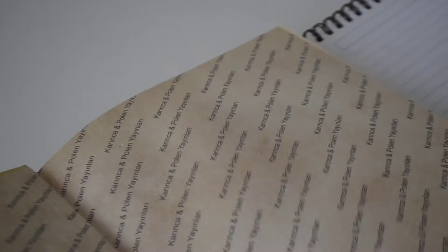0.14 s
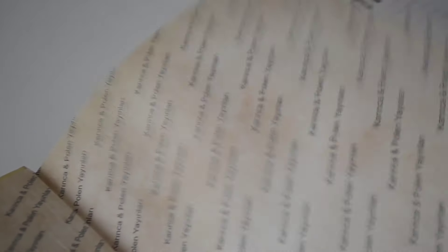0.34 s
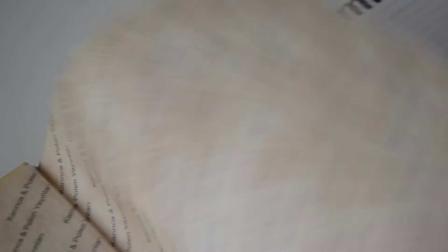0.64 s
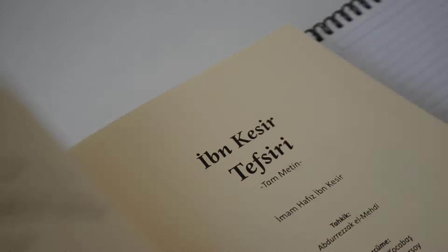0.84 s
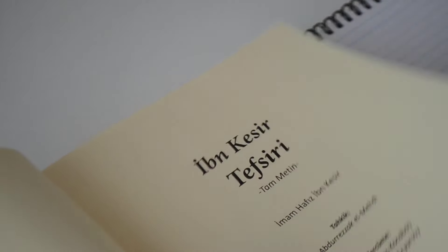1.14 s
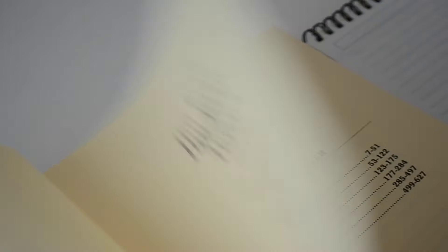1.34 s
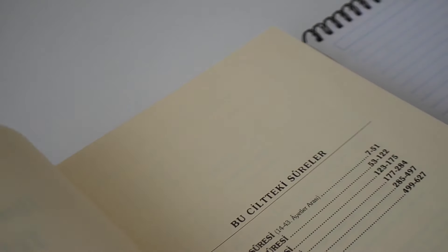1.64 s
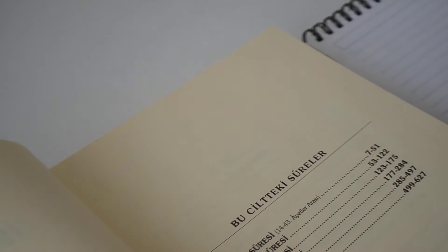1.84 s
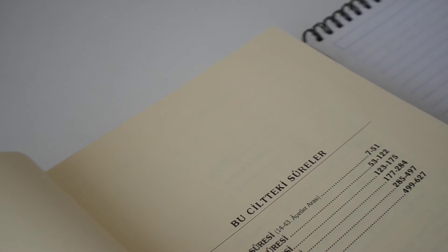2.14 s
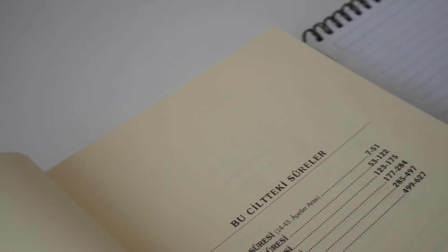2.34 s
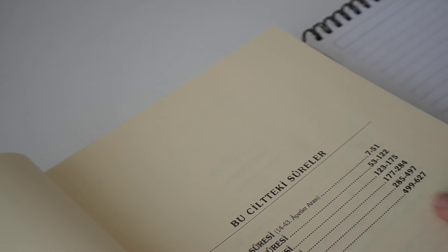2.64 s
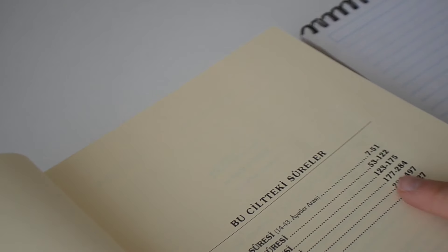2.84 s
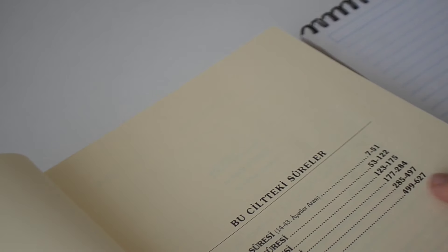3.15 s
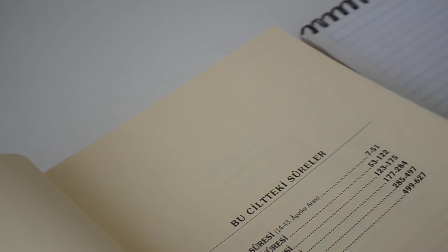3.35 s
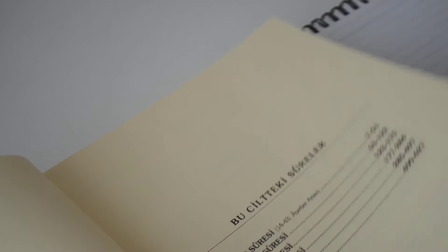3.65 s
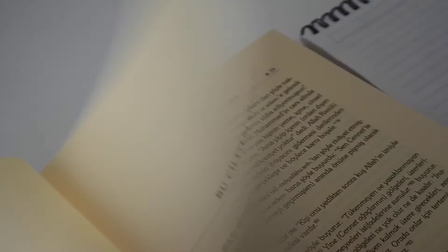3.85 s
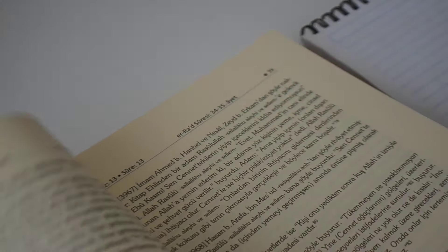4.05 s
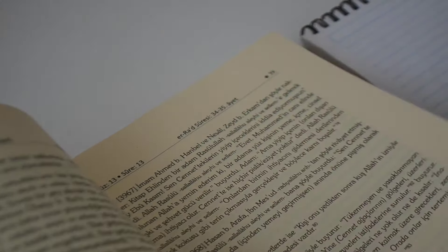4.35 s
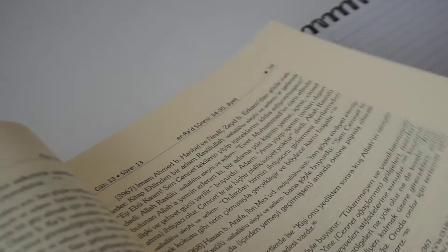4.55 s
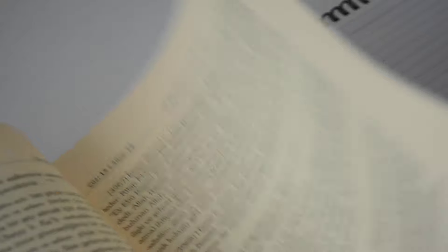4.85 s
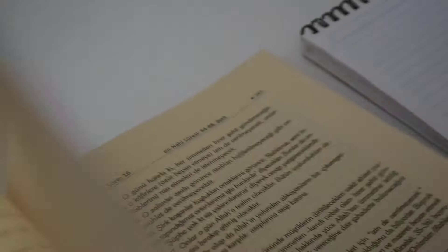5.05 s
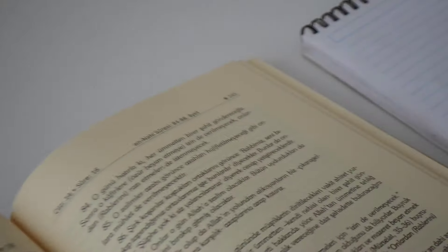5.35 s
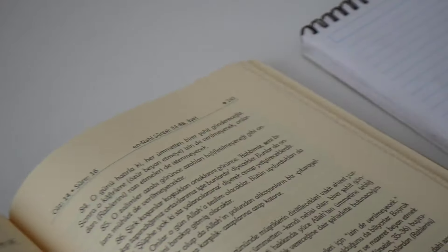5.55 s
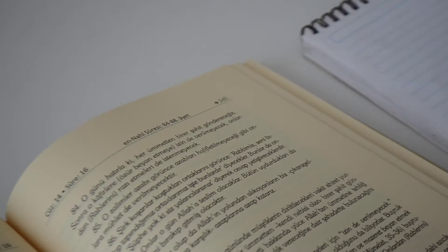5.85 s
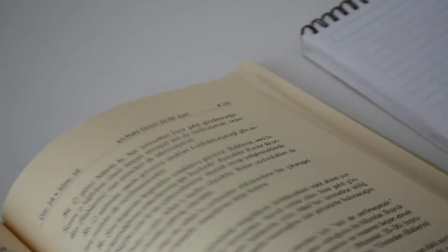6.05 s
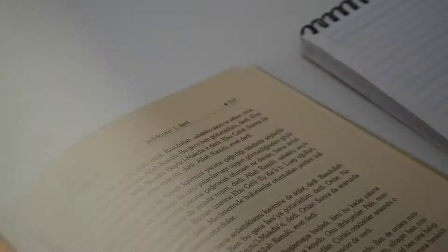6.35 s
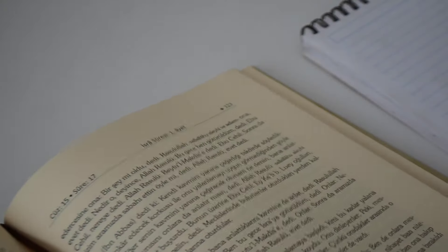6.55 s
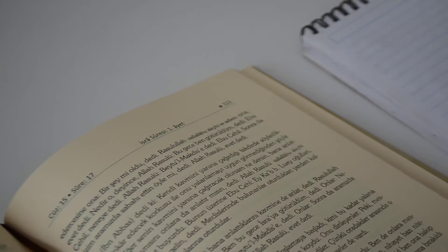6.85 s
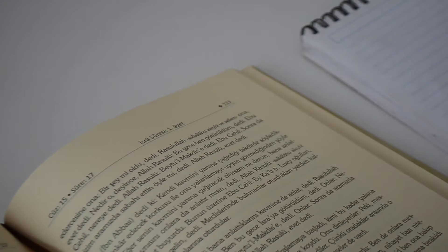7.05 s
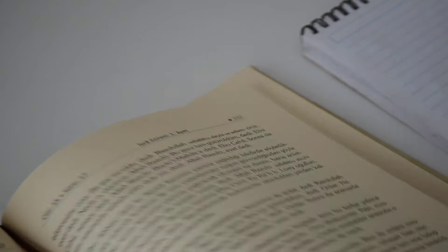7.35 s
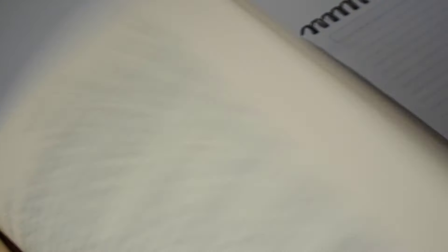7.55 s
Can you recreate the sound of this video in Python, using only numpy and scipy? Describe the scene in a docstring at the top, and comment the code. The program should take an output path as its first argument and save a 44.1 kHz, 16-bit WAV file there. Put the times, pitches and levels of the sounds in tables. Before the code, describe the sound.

Close, dry page turning from a thick book on a desk in a quiet room, over faint low-weighted hiss and a very thin, steady high whine. From 0 to 0.9 seconds, light sliding, a small juddering rasp and soft flicks. At 1.1 a loud crisp snap starts a burst of pops, crackles and bright edge clicks until about 1.65. Another hard snap at 1.84 leads to more snaps and swishes through 2.1. Then near stillness, with one tiny pop around 2.65. Rustling returns at 3.5; a muffled snap at 3.7 and a firmer landing at 4.05 with a soft puff. Rubbing follows, a hollow papery pop at 4.83, then a cluster of dull snaps at 5.3-5.5. Light brushing near 5.9, then a juddering slide into a snap with a deep soft thump at 6.5. Quiet rustles around 7.1, and a final sharp snap at 7.68.

```python
"""Pages of a thick book rustle, crackle and snap, close by on a desk in a quiet room, under a thin high whine.
Sheets slide with a low flutter and a fibrous hiss (shaped noise clicks) and judder in trains of slips.
They snap as they buckle (short resonant pulses), flick at the edges and land with a soft puff of air.
A few low or papery tones ring on. Echoes and a short tail from nearby surfaces colour most of the paper."""
import sys
import numpy as np
from scipy import signal
from scipy.fft import rfft, irfft
from scipy.io import wavfile

SR = 44100
rng = np.random.default_rng(int(sys.argv[2]) if len(sys.argv) > 2 else 0)


def materialize(psi):
    """Save the field psi as 16-bit PCM at rate SR to the path in sys.argv[1].

    A 1-D psi becomes a single channel; in a 2-D psi each row is a channel.
    """
    bounded = np.clip(np.atleast_2d(psi).T, -1, 1)
    quanta = np.round(bounded * 32767).astype(np.int16)
    wavfile.write(sys.argv[1], SR, quanta)


N = 340011  # length in samples

# Event levels below come before each layer's trim and the room.
# Spectrum of the background hiss. Each row: frequency in Hz, relative level in dB.
HISS_FLOOR_COLOUR = [(12, -60), (20, -5.5), (76, -2.5), (259, -11), (289, -8), (401, -14.5), (499, -9.5),
                     (556, -13), (731, -14), (1130, -15.5), (2630, -21.5), (3650, -25), (4540, -30),
                     (13500, -38.5)]
HISS_FLOOR_DB = -54.5
# Stereo width of the background hiss. Each row: frequency in Hz, side against middle in dB.
HISS_FLOOR_WIDTH = [(30, -26), (130, -11.5), (300, -8), (1000, -6), (4000, -9), (7000, -10.5), (10000, -5),
                    (14000, -7)]
WHINE_HZ, WHISTLE_HZ, FLIP_CYCLE_HZ = 15000, 15677, 29.97
TOP_EDGE_HZ = 15900
# Nearby surfaces; the back of a sheet radiates with opposite sign. Each row: delay in ms, gain.
ECHOES = [(1.15, 0.046), (2.0, 0.0068), (3.3, 0.11), (5.05, -0.17), (7.9, 0.0035), (16.2, -0.13)]
# Decay of the diffuse tail. Each row: frequency in Hz, time to fall 60 dB in seconds.
ROOM_DECAY = [(150, 0.82), (400, 0.35), (1040, 0.091), (2760, 0.03), (7280, 0.45)]
# A hanging sheet or the desk rings on.
# Each row: start in seconds, pitch in Hz, peak level in dB, time to fall 60 dB in seconds.
RINGS = [(1.1, 64, -42.5, 2.4), (1.85, 65, -42.5, 1.8), (3.72, 61.4, -45, 1.9), (4.01, 62.4, -49, 0.92),
         (4.067, 639, -37, 0.4), (4.83, 700, -31, 0.2), (5.296, 703, -35.5, 0.41), (6.51, 66.7, -49, 0.81)]
# A sheet lands and pushes air out. Each row: start in seconds, peak level in dB.
PUFFS = [(0.79, -36), (1.095, -29), (1.197, -36), (4.009, -25.5), (4.067, -31.5), (4.446, -32),
         (4.577, -38.5), (5.063, -35.5), (5.322, -28.5), (5.359, -44), (6.508, -18)]
# Spectrum of a puff. Each row: frequency in Hz, relative level in dB.
PUFF_COLOUR = [(20, -9), (60, 4), (125, 2), (190, -3.5), (300, -3), (600, -29), (2000, -62), (8000, -78)]
# One sheet slides over another. Each row: start, fastest moment and end in seconds (sorted on use),
# flutter of the sheet in dB, hiss of its fibres in dB.
SLIDES = [(0.0, 0.006, 0.044, -41.5, -74), (0.097, 0.123, 0.91, -54.5, -55), (0.32, 0.39, 0.55, -41, -57.5),
          (0.51, 0.598, 0.74, -47, -54), (0.663, 0.72, 0.8, -43.5, -47), (0.788, 0.846, 0.944, -40, -50),
          (0.918, 0.97, 1.14, -50.5, -58), (1.108, 1.13, 1.58, -40, -50), (1.26, 1.384, 1.54, -49, -46.5),
          (1.448, 1.512, 1.705, -37.5, -49), (1.654, 1.75, 1.89, -51.5, -47.5),
          (1.833, 1.993, 2.09, -46.5, -42), (2.071, 2.162, 2.225, -49, -46), (2.35, 2.6, 3.6, -61.5, -64.5),
          (3.148, 3.423, 3.5, -63, -59.5), (3.493, 3.562, 3.66, -44.5, -43),
          (3.66, 3.722, 4.04, -47.5, -52), (3.997, 4.05, 4.17, -51, -48), (4.296, 4.318, 4.34, -47, -58.5),
          (4.36, 4.483, 4.64, -44.5, -49), (4.6, 4.621, 4.65, -77, -50), (4.725, 4.763, 4.73, -48, -62),
          (4.85, 4.938, 5.16, -48, -61), (5.04, 5.095, 5.3, -46.5, -55.5), (5.219, 5.357, 5.5, -39, -45.5),
          (5.474, 5.513, 5.69, -48, -53), (5.724, 5.746, 6.06, -51, -57), (5.845, 5.924, 6.12, -43, -49),
          (6.025, 6.075, 6.46, -51.5, -59), (6.203, 6.29, 6.41, -54, -53),
          (6.365, 6.51, 6.52, -35.5, -58.5), (6.5, 6.56, 6.7, -43.5, -48), (6.649, 6.684, 6.84, -51, -50),
          (6.783, 6.864, 7.2, -61, -63), (7.08, 7.133, 7.27, -47, -51), (7.186, 7.35, 7.56, -53, -54.5),
          (7.671, 7.682, 7.63, -34.5, -56)]
# An edge slides off its neighbour.
# Each row: start, loudest moment and end in seconds (sorted on use), level in dB.
EDGE_SWISHES = [(0.625, 0.77, 0.76, -49), (0.79, 0.843, 0.85, -43.5), (1.368, 1.37, 1.41, -35.5),
                (2.021, 2.07, 2.04, -36), (3.584, 3.627, 3.665, -41), (4.002, 4.02, 4.05, -38.5),
                (4.02, 4.06, 4.12, -41), (6.011, 6.297, 6.26, -56.5)]
# Spectra of flutter, fibre hiss and edge swish. Each row: frequency in Hz, relative level in dB.
FLUTTER_COLOUR = [(25, -3.5), (70, -6.5), (170, -4), (350, 3.5), (650, 2.5), (1100, 3), (1700, -1.5),
                  (2400, -6), (5000, -34), (12000, -74)]
HISS_COLOUR = [(200, -46), (1200, 8.5), (2400, 3), (3600, 3.5), (4900, 0.5), (6000, -7.5), (7200, -16.5),
               (10000, -22.5), (16000, -19)]
SWISH_COLOUR = [(300, 7), (1500, 3), (3000, 2), (5200, 0.5), (7000, -8), (9000, -12), (12000, -22),
                (16000, -27)]
SWELL_POWER = 0.83  # loudness follows the sliding speed to this power
SHAKE_DB, SHAKE_S = -27.5, 0.041  # flutter after a snap: level against the snap's, decay time constant
# A lifted sheet brushes along its neighbour.
# Each row: start, loudest moment and end in seconds (sorted on use), level in dB.
BRUSHES = [(0.317, 0.34, 0.359, -39), (0.535, 0.596, 0.65, -44), (3.386, 3.396, 3.49, -55),
           (4.39, 4.53, 4.52, -48.5), (4.89, 4.986, 5.06, -46.5), (5.255, 5.28, 5.44, -49),
           (5.42, 5.465, 5.47, -39), (5.86, 5.9, 6.01, -45), (6.424, 6.444, 6.48, -46),
           (7.069, 7.106, 7.32, -50)]
# Spectrum of a brush. Each row: frequency in Hz, relative level in dB.
BRUSH_COLOUR = [(300, -37), (900, -30), (1500, 8.5), (2300, 3.5), (3400, 1), (5000, -8.5), (7000, -26),
                (16000, -37)]
# A sheet sticks and slips. Each row: start, loudest moment and end in seconds (sorted on use), level in dB,
# typical slips per second, bass tilt in dB, treble tilt in dB, resonance in Hz.
JUDDERS = [(0.355, 0.4, 0.47, -30.5, 440, -2, -18.5, 1340), (0.705, 0.759, 0.84, -31, 345, -1, -22.5, 615),
           (1.181, 1.2, 1.205, -33, 490, -9, -27, 1450), (1.33, 1.338, 1.46, -29, 436, 4, -14, 1510),
           (3.716, 3.733, 3.745, -28.5, 450, -7, -33, 1220), (5.854, 5.947, 5.9, -39, 395, -3, -17, 1230),
           (6.349, 6.371, 6.42, -35, 380, -2, -35, 1050), (6.427, 6.455, 6.48, -23.5, 460, -16, -26, 760),
           (7.07, 7.113, 7.15, -32.5, 305, -25, -30, 1090)]
# A paper edge flicks free. Each row: start in seconds, level in dB.
TICKS = [(0.367, -30.5), (0.3945, -35), (0.5173, -31), (0.7702, -21), (0.943, -41), (1.265, -26),
         (1.335, -15.5), (1.3775, -13.5), (1.5609, -22), (2.0562, -22), (2.707, -41.5), (4.591, -34),
         (5.0355, -40), (5.2462, -32), (5.953, -26.5), (6.5196, -24), (6.6228, -29)]
# Spectrum of a flick. Each row: frequency in Hz, relative level in dB.
TICK_COLOUR = [(100, -83), (700, 7), (1800, 4.5), (3400, 3.5), (5000, -0.5), (7000, -25), (11000, -32),
               (16000, -29)]
# A sheet buckles. Each row: start in seconds, level in dB, bass tilt in dB, treble tilt in dB,
# main resonance of the bent sheet in Hz.
SNAPS = [(0.3663, -25, 4.5, -18, 1290), (0.673, -34, -8, -18, 1000), (0.77, -28, 4, -16, 890),
         (1.0954, -3, -7, -9.5, 897), (1.195, -9.5, -7, -11, 890), (1.2544, -15.5, -58, -9, 910),
         (1.3073, -18, -12, -6, 1510), (1.336, -12, -19, -6, 1640), (1.3787, -15.5, -19, -38, 1490),
         (1.5096, -21.5, -25.5, -1, 1490), (1.5605, -24, -14, -20, 1113), (1.64, -30.5, -32, -38, 1300),
         (1.8419, -4, -14, -13.5, 890), (1.892, -21.5, -1, -22, 1194), (1.924, -26, -16, -13, 1380),
         (1.9554, -8.5, -36, -14, 950), (2.0369, -13, -27, -17, 890), (2.0877, -20, -35, -12, 913),
         (2.647, -33.5, 1, -25, 606), (3.7256, -22.5, -12, -45, 1120), (3.803, -32, -20, -38, 1490),
         (3.956, -34.5, 11, -8.5, 850), (4.0072, -21, -21, -17, 684), (4.0661, -25, 1, -8, 686),
         (4.068, -12.5, -23.5, -20, 665), (4.829, -18.5, -2.5, -44, 702), (4.866, -32, -19, -44, 706),
         (4.938, -29.5, -12, -25, 710), (5.295, -13, -6, -47, 620), (5.3229, -12.5, -3, -15.5, 720),
         (5.4112, -18.5, -10, -15.5, 623), (5.521, -29.5, -1, -13, 690), (5.953, -31, -4, -16, 1013),
         (6.354, -23, -26, -18, 1130), (6.3712, -26, -25, -22, 1105), (6.5098, -15, -2.5, -19, 657),
         (6.517, -12.5, -17, -12, 1250), (7.084, -26, -43, -30, 980), (7.1807, -25.5, -21, -9.5, 1093),
         (7.645, -27, 2, -22, 680), (7.6806, -10.5, -23, -10.5, 1210), (7.6835, -13.5, -3, -27, 524)]
# Spectrum of a flexing sheet before tilt and resonance. Each row: frequency in Hz, relative level in dB.
SHEET_COLOUR = [(40, -2), (120, -3), (280, 3), (500, 0), (850, 1.5), (1200, -4.5), (1600, 2), (2200, -3.5),
                (3100, 0.5), (4500, -9), (6500, -28), (10000, -40), (16000, -39)]


def amp(db):
    """Decibels to gain."""
    return 10 ** (np.asarray(db) / 20)


def unit(x):
    """Scales to rms 1."""
    return x / np.sqrt(np.mean(x ** 2) + 1e-20)


def read(points, hz):
    """Reads (Hz, value) points on a log-frequency axis."""
    f, value = np.transpose(points)
    return np.interp(np.log(hz + 1), np.log(f + 1), value)


def add(mix, s, sound):
    """Mixes a sound in at s seconds, cutting what runs past the end."""
    part = mix[max(round(s * SR), 0):][:len(sound)]
    part += sound[:len(part)]


def pulse(*colours, spread_ms=0, size=4096):
    """A causal pulse with the product of the given spectra; bending waves bring its treble first."""
    hz = np.fft.fftfreq(size, 1 / SR)
    log_gain = np.log(amp(sum(read(c, abs(hz)) for c in colours)))
    minimum_phase = np.conj(signal.hilbert(log_gain))
    # spread_ms is the added delay at 1 kHz; it shrinks as frequency rises
    lag = 4 * np.pi * spread_ms * np.sign(hz) * np.sqrt(abs(hz) / 1000)
    wave = np.fft.ifft(np.exp(minimum_phase - 1j * lag)).real[:size // 2]
    return wave / np.linalg.norm(wave)


def tint(x, colour):
    """Gives a long noise a spectrum, at rms 1."""
    gain = amp(read(colour, np.fft.rfftfreq(N, 1 / SR)))
    return unit(irfft(rfft(x) * gain, N))


def drift(per_s):
    """A random curve: per_s normal values a second, joined by straight lines."""
    knots = rng.standard_normal(N)
    return np.interp(np.arange(N) * per_s / SR, np.arange(N), knots)


def stroke(start, top, end):
    """A swell from nothing to 1 and back, with its three times put in order."""
    return np.interp(np.arange(N) / SR, np.sort([start, top, end]), [0, 1, 0])


def friction(colour, per_s, spread_db, clump_db):
    """Countless fibres catch and let go: clicks of uneven size whose strength swells in clumps."""
    size = amp(spread_db * np.minimum(rng.exponential(1, N), 4))
    hits = rng.random(N) < per_s / SR
    clicks = rng.standard_normal(N) * size * hits
    return tint(clicks * amp(clump_db * drift(140)), colour)


def struck(wave, noise_gain, decay_s, length):
    """Drives a pulse with one click and a dying noise, both at the same spot."""
    t = np.arange(length) / SR
    force = (t == 0) + noise_gain * rng.standard_normal(length) * np.exp(-t / decay_s)
    return signal.fftconvolve(force, wave)


def sheet(bass_db, treble_db, hz, ring_db=6, width=1.23, bend_ms=0.836):
    """One flexing of a sheet: a wide bend is dull and low, a tight one is bright."""
    knee = np.clip(1.74 * hz, 600, 1800)  # the treble tilt starts here
    tilt = [(250, bass_db), (500, 0), (knee, 0), (2 * knee, treble_db)]
    resonance = [(hz / width, 0), (hz, ring_db), (hz * width, 0)]
    return pulse(SHEET_COLOUR, tilt, resonance, spread_ms=bend_ms)


def background(whine_db=-60.0, whistle_db=-75):
    """Background hiss is shaped noise, partly independent left and right; a whistle and a sign-flipping whine join."""
    t, hz = np.arange(N) / SR, np.fft.rfftfreq(N, 1 / SR)
    mid, side = (tint(rng.standard_normal(N), HISS_FLOOR_COLOUR) for _ in range(2))
    side = irfft(rfft(side) * amp(read(HISS_FLOOR_WIDTH, hz)), N)
    hiss_floor = mid + np.array([side, -side])
    flips = np.tanh(30 * np.sin(2 * np.pi * FLIP_CYCLE_HZ * t))  # two flips a cycle
    whine = unit(flips * np.sin(2 * np.pi * WHINE_HZ * t))
    whistle = unit(np.sin(2 * np.pi * WHISTLE_HZ * t))
    return amp(HISS_FLOOR_DB) * hiss_floor + amp(whine_db) * whine + amp(whistle_db) * whistle


def room(x, wet_db=-8, build_s=0.0039, side_db=-19):
    """Surfaces return distinct echoes, and a short diffuse tail differs slightly between the ears."""
    hz = np.fft.rfftfreq(N + SR, 1 / SR)
    paths = 1 + sum(gain * np.exp(-2j * np.pi * hz * ms / 1000) for ms, gain in ECHOES)
    near = irfft(rfft(x, N + SR) * paths, N + SR)[:N]
    # half a second of noise, building up quickly and dying at its own rate in each band
    hz, t, z = signal.stft(rng.standard_normal((2, SR // 2)), SR, nperseg=256)
    z = z * 1000 ** (-t / read(ROOM_DECAY, hz)[:, None])
    build = 1 - np.exp(-(t / build_s) ** 2)
    tails = signal.istft(z * build, SR, nperseg=256)[1]
    tails = tails / np.linalg.norm(tails[0])
    mid, side = signal.oaconvolve(x[None], tails, axes=1)[:, :N]
    return near + amp(wet_db) * (mid + amp(side_db) * np.array([side, -side]))


def rings(wander=0.021):
    """Single modes die away, cut after a second; their pitch wanders as the sheet keeps bending."""
    out, t = np.zeros(N), np.arange(SR) / SR
    for s, hz, db, t60 in RINGS:
        turns = np.cumsum(hz * (1 + wander * drift(134)[:SR])) / SR
        fade = np.exp(-np.log(1000) * t / t60)
        add(out, s, amp(db) * np.sin(2 * np.pi * turns) * fade)
    return out


def puffs(trim_db=-1, eddy=0.072, settle_s=0.019):
    """The air cushion under a falling sheet gives a soft low push, then eddies as the sheet settles."""
    out, wave = np.zeros(N), pulse(PUFF_COLOUR)
    wave = wave / abs(wave).max()
    for s, db in PUFFS:
        add(out, s, amp(db + trim_db) * struck(wave, eddy, settle_s, SR // 8))
    return out


def brushes(trim_db=-2):
    """A broad free sheet gives a grainy rasp, lower than the hiss of an edge."""
    pressure = sum(amp(db + trim_db) * stroke(start, top, end) for start, top, end, db in BRUSHES)
    return pressure * friction(BRUSH_COLOUR, per_s=3400, spread_db=-2.0, clump_db=1.5)


def shaking():
    """Strength of the decaying flutter that each snap leaves in the sheet."""
    out, t = np.zeros(N), np.arange(SR // 3) / SR
    for s, db, *_ in SNAPS:
        add(out, s, amp(db + SHAKE_DB) * np.exp(-t / SHAKE_S))
    return out


def sliding(flutter_db=-3, hiss_db=-2, swish_db=-1):
    """Changing speed shakes the whole sheet and rasps its fibres; a free edge hisses brighter."""
    flutter, hiss = shaking(), np.zeros(N)
    for start, top, end, sheet_db, fibres_db in SLIDES:
        rub = stroke(start, top, end) ** SWELL_POWER
        flutter += amp(sheet_db) * rub
        hiss += amp(fibres_db) * rub
    edges = sum(amp(db) * stroke(start, top, end) for start, top, end, db in EDGE_SWISHES)
    flutter = flutter * friction(FLUTTER_COLOUR, per_s=2500, spread_db=1.5, clump_db=3.0)
    hiss = hiss * friction(HISS_COLOUR, per_s=7000, spread_db=0.5, clump_db=3.5)
    swish = edges * friction(SWISH_COLOUR, per_s=7000, spread_db=1.5, clump_db=4.0)
    return amp(flutter_db) * flutter + amp(hiss_db) * hiss + amp(swish_db) * swish


def judders(trim_db=-3, jitter=0.45, uneven_db=3):
    """A sheet sticks and slips in uneven trains, each slip flexing it."""
    out = np.zeros(N)
    for start, top, end, db, per_s, *shape in JUDDERS:
        turns = np.cumsum(per_s * np.exp(jitter * drift(400))) / SR
        slips = np.diff(np.floor(turns), prepend=0)  # one click per whole turn
        slips = slips * amp(uneven_db * rng.standard_normal(N))
        train = unit(signal.oaconvolve(slips - slips.mean(), sheet(*shape))[:N])
        out += amp(db + trim_db) * stroke(start, top, end) * train
    return out


def ticks(scrape=0.15, scrape_s=0.0043):
    """An edge flicks free: a click and a very short scrape."""
    out, click = np.zeros(N), pulse(TICK_COLOUR)
    for s, db in TICKS:
        wave = struck(click, scrape, scrape_s, SR // 50)
        add(out, s, amp(db) * wave / abs(wave).max())
    return out


def snaps(trim_db=-2.0, creak=0.077, creak_s=0.006):
    """Each buckle is one short pulse of the sheet; the crease creeps on for a few milliseconds."""
    out = np.zeros(N)
    for s, db, *shape in SNAPS:
        wave = sheet(*shape)
        wave = wave / abs(wave).max()
        add(out, s, amp(db + trim_db) * struck(wave, creak, creak_s, SR // 25))
    return out


def scene():
    """Most paper sounds excite the room; puffs, rings and the background stay direct."""
    paper = brushes() + sliding() + judders() + ticks() + snaps()
    return background() + rings() + puffs() + room(paper)


def record(dry):
    """A steep low-pass closes off the top of the treble."""
    low_pass = signal.firwin(511, TOP_EDGE_HZ, window=("kaiser", 9), fs=SR)
    return signal.oaconvolve(dry, low_pass[None], "same")


dry = scene()
out = record(dry)
materialize(out)
```